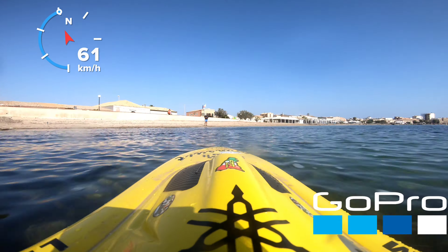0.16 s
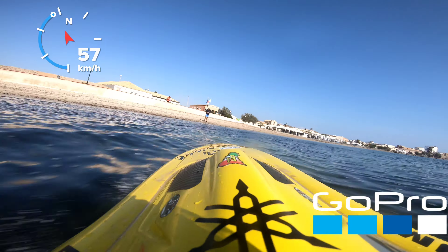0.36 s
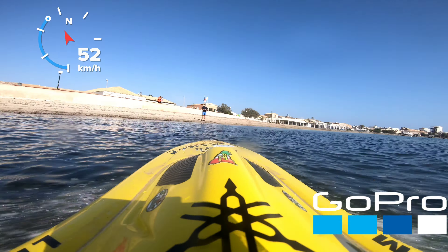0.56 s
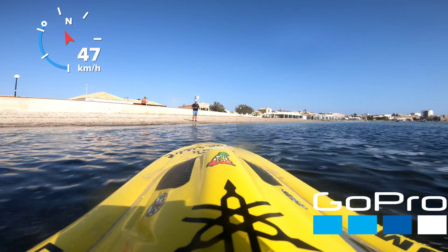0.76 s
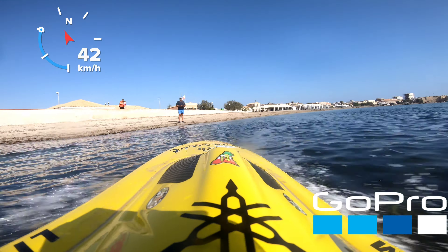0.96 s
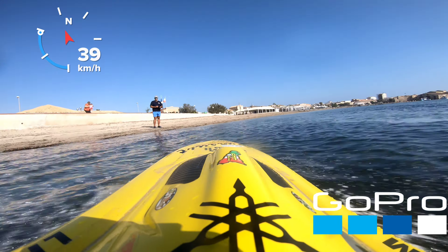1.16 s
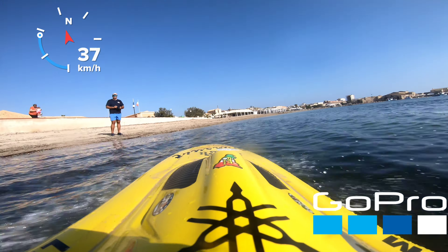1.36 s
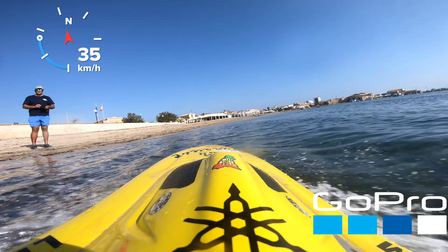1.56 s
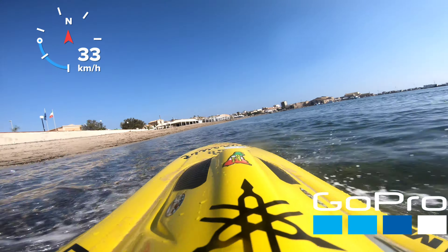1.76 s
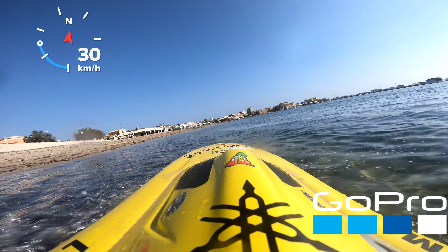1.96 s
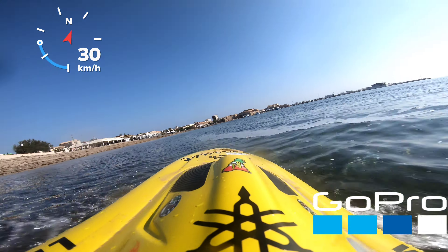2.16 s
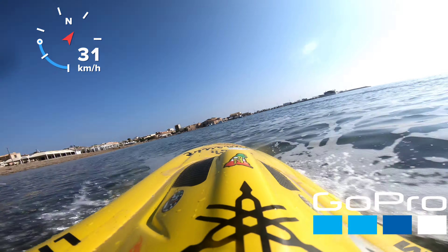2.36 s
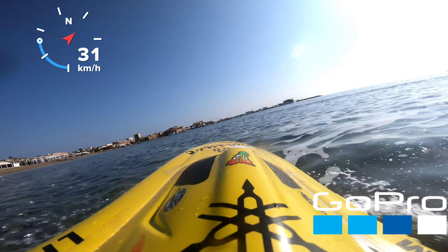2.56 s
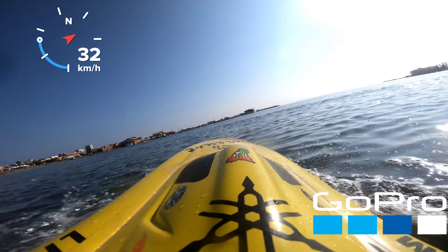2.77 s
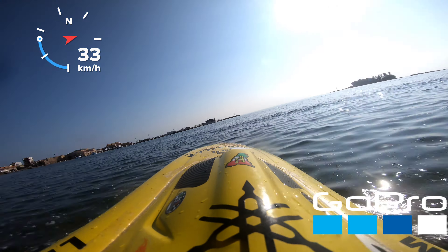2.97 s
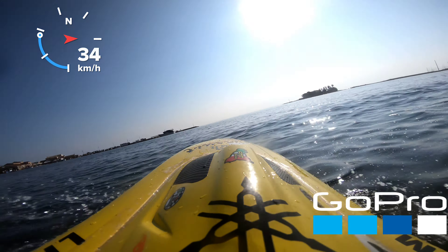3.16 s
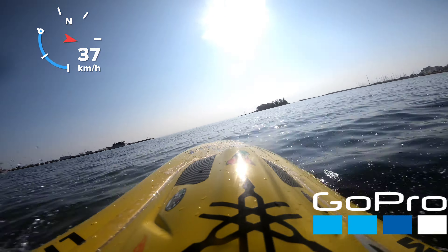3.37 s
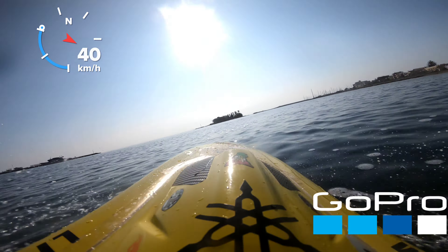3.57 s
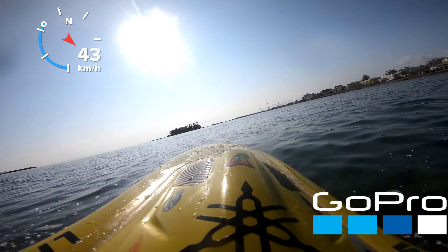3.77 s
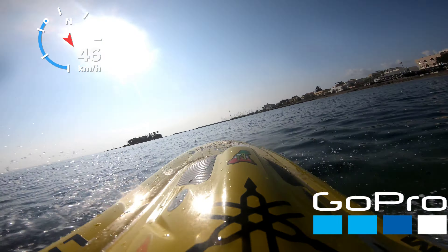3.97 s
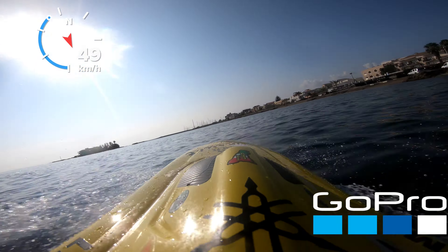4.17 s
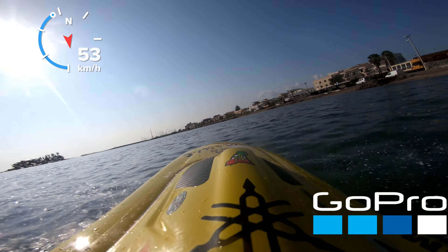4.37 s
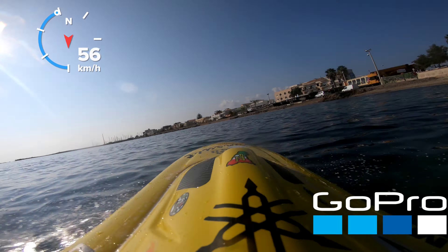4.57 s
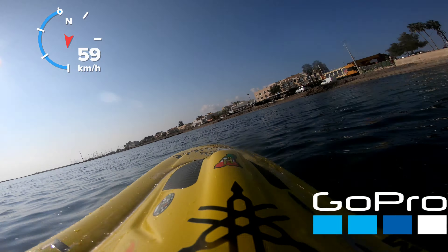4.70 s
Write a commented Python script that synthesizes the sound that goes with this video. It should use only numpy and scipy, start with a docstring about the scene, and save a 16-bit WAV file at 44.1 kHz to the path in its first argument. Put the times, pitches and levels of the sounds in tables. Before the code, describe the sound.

A model speedboat's electric motor whines close to an onboard microphone, with a rattling shaft and hissing bearings. It starts high, is throttled back for a long stretch, and slowly winds up to full speed, where the propeller lifts out of the water in rough, bright revs. The pitch falls again near the end. Underneath run low thumps of chop on the hull, washing water and a light patter of spray.

```python
"""On choppy water, aboard the deck of a small electric radio-controlled speedboat.
The motor runs flat out, is throttled back for a long turn, winds up again and is cut back once more.
Its shaft whines at multiples of its speed and rattles in its tube, the bearings hiss, and the
propeller races when it lifts clear. Underneath, chop thumps the hull, water washes along its
bottom and a fine spray patters on the deck."""
import sys
import numpy as np
from scipy import signal
from scipy.fft import rfft, irfft, next_fast_len
from scipy.io import wavfile
from scipy.ndimage import uniform_filter1d, minimum_filter1d

SR = 44100
rng = np.random.default_rng(int(sys.argv[2]) if len(sys.argv) > 2 else 0)


def store_wav(level_fs):
    """Save 16-bit WAV to argv[1]."""
    pcm = np.round(np.clip(np.atleast_2d(level_fs), -1, 1) * 32767)
    wavfile.write(sys.argv[1], SR, pcm.T.astype(np.int16))


N = 261321

# Shaft speeds in turns per second: the hull planes, the propeller starts to lift, it is clear.
PLANING_HZ, LOADED_HZ, CLEAR_HZ = 397.5, 626, 670
MOTOR_SHARE = 0.5   # the flexible shaft passes this share of a racing spurt on to the motor
# The steady bed of chop under the hull. Each row: time in seconds, rumble level in dB.
CHOP_BED = [(0, -32), (.26, -23), (.75, -24.5), (1.3, -23), (1.8, -23), (3.5, -25), (3.7, -29),
            (4.1, -27.5), (4.22, -18.5), (4.7, -16), (5.4, -14.5), (5.93, -36)]


def from_db(db):
    """Decibels to gain."""
    return 10 ** (np.asarray(db) / 20)


def rms_one(x):
    """Scale to an rms of 1."""
    return x / np.sqrt(np.mean(x ** 2) + 1e-20)


def in_time(points):
    """Draw a curve through (seconds, value) points, at every sample."""
    return np.interp(np.arange(N) / SR, *np.transpose(points))


def at_hz(points, hz):
    """Read an EQ curve of (Hz, dB) points on a log-frequency axis."""
    point_hz, point_db = np.transpose(points)
    return np.interp(np.log(np.maximum(hz, 1)), np.log(point_hz), point_db)


def swell(centre, length):
    """An arch of height 1 around a moment; both settings in seconds."""
    return np.cos(np.pi * np.clip((np.arange(N) / SR - centre) / length, -0.5, 0.5))


def hump(x, centre, width):
    """A bell of height 1 that has fallen to a half at width / 2 from its centre."""
    return 1 / (1 + (2 * (x - centre) / width) ** 2)


def drift(rate):
    """Smooth random modulation that rolls off above `rate` Hz; spread about 1."""
    step, run_in = 10, 8000
    pole = np.exp(-2 * np.pi * rate * step / SR)
    noise = rng.standard_normal(N // step + run_in + 2)
    slow = signal.lfilter([1], [1, -2 * pole, pole * pole], noise)[run_in:]
    return np.interp(np.arange(N) / step, np.arange(len(slow)), rms_one(slow))


def coloured(x, spectrum):
    """Shape a noise with an EQ curve, falling away beyond its ends; rms 1."""
    size = next_fast_len(N)
    hz = np.maximum(np.arange(size // 2 + 1) * SR / size, 1)
    skirts = np.minimum(1, np.minimum(hz / spectrum[0][0], spectrum[-1][0] / hz)) ** 4
    return rms_one(irfft(rfft(x, size) * skirts * from_db(at_hz(spectrum, hz)), size)[:N])


def resonance(x, hz, width):
    """Two-pole resonance with a gain of 1 at its peak."""
    r = np.exp(-np.pi * width / SR)
    poles = [1, -2 * r * np.cos(2 * np.pi * hz / SR), r * r]
    return signal.lfilter(np.array([1, 0, -1]) * (1 - r * r) / 2, poles, x)


def evened(x, size=3000):
    """Hold a noise at rms 1 over `size` samples, keeping its faster grain."""
    return x / np.sqrt(uniform_filter1d(uniform_filter1d(x * x, size), size) + 1e-12)


def wind_down_ring():
    """A ringing in a few narrow treble bands, heard faintly while the motor winds down; rms 1."""
    # The ringing bands. Each row: pitch in Hz, width of each of two filter passes in Hz, level in dB.
    bands = [(4950, 160, 1.5), (5450, 150, -1), (6240, 260, 2.5), (6830, 220, -1), (7350, 220, -4),
             (8320, 250, -7), (9520, 200, -9)]
    noise = rng.standard_normal(N)
    return rms_one(sum((-1) ** k * from_db(db) * resonance(resonance(noise, hz, width), hz, width)
                       for k, (hz, width, db) in enumerate(bands)))


def spray(ploughing, strain_db, drops_per_s=900):
    """Uneven drops patter on the deck as the hull ploughs; in a lull they give way to a faint ringing."""
    # The tone of drops on the deck. Each row: frequency in Hz, level in dB.
    drop_tone = [(5000, -3), (7300, -0.5), (9500, -7), (12000, -18.5), (14500, -32.5)]
    # The spray lets up as the motor winds down. Each row: centre in seconds, length in seconds.
    lulls = [(0.818, 1.0), (5.7, 0.29)]
    lull = np.sqrt(np.abs(sum(swell(s, length) for s, length in lulls)))
    drops = (rng.random(N) < drops_per_s / SR) * rng.standard_normal(N)
    patter = from_db(-71 + 1.5 * strain_db) * ploughing * coloured(drops, drop_tone)
    return (1 - lull) * patter + lull * from_db(-68) * wind_down_ring()


def hull_drone(speed, mode_hz=55.45):
    """At full speed the chop keeps the hull's lowest mode swinging almost steadily."""
    swing = np.sin(2 * np.pi * mode_hz * np.arange(N) / SR + 1.2 * drift(1.3))
    level_db = in_time(CHOP_BED) - 6 + 1.4 * drift(17)
    return from_db(level_db) * (speed / LOADED_HZ) ** 3 * rms_one(swing)


def wave_slaps(ploughing, rise_s=0.042, fall_s=0.046):
    """Gains of rumble and wash: a steady bed, and a swell each time the hull slaps into a wave."""
    # The slaps. Each row: peak time in seconds, thump level in dB, wash level in dB.
    slaps = [(.03, -15, -23), (.15, -15, -28.5), (.38, -18, -40), (.51, -19.5, -38), (0.639, -17, -20),
             (.74, -16, -20), (0.841, -37, -19.5), (0.961, -26.5, -21.5), (1.1, -19.5, -24.5),
             (1.22, -32, -26.5), (1.33, -43, -21), (1.5, -20.5, -14.5), (1.67, -19.5, -19.5),
             (1.8, -18, -18), (1.96, -28, -20.5), (2.34, -19, -31), (2.599, -23, -27), (2.78, -17.5, -17.5),
             (2.958, -21, -14.5), (3.091, -25, -17.5), (3.198, -15.5, -19), (3.402, -18, -21),
             (3.59, -20.5, -36), (4.07, -29.5, -20.5), (4.42, -16, -28), (4.62, -15, -23.5),
             (5.5, -27, -19.5), (5.649, -14.5, -22), (5.851, -13, -22.5)]
    t = np.arange(N) / SR
    rumble_power = from_db(in_time(CHOP_BED)) ** 2
    wash_power = from_db(-31.5 + 6.5 * ploughing) ** 2
    for s, thump_db, wash_db in slaps:
        slap = np.exp(-((t - s) / np.where(t < s, rise_s, fall_s)) ** 2)
        rumble_power += from_db(thump_db) ** 2 * slap
        wash_power += from_db(wash_db) ** 2 * slap
    return np.sqrt(rumble_power), np.sqrt(wash_power)


def water(ploughing):
    """Chop thumps the hull's lowest modes; the wash drums on its bottom panels."""
    # The hull's bass modes. Each row: pitch in Hz, width in Hz, level in dB.
    hull_modes = [(51.3, 11.3, -1.5), (92.5, 29, -6), (124.6, 38, -10)]
    # The tone of the wash. Each row: frequency in Hz, level in dB.
    wash_tone = [(140, -11.5), (200, -13.5), (262, 4), (325, -5), (390, 0), (480, -4.5), (560, -11.5),
                 (690, -14), (820, -29.5), (1200, -63)]
    rumble_gain, wash_gain = wave_slaps(ploughing)
    chop = rng.standard_normal(N) * from_db(7.2 * drift(5.9))
    rumble = sum((-1) ** k * from_db(db) * resonance(chop, hz, width)
                 for k, (hz, width, db) in enumerate(hull_modes))
    rumble = signal.sosfilt(signal.butter(2, [30, 165], "band", fs=SR, output="sos"), rumble)
    wash = coloured(rng.standard_normal(N) * from_db(3.3 * drift(25)), wash_tone)
    return rumble_gain * evened(rumble) + wash_gain * evened(wash)


def ride(speed, release_s=0.077):
    """Three shares, 0-1: the slow hull ploughs, the throttled motor coasts, the propeller lifts clear."""
    ploughing = 1 / (1 + (speed / PLANING_HZ) ** 12)
    slowing = uniform_filter1d(-np.gradient(np.log2(speed)) * SR, size=2000)
    slowing *= np.clip((LOADED_HZ - speed) / 80, 0, 1)
    unloaded = np.clip(slowing / 1.4, 1e-6, 1) ** 1.5   # no drive left when losing 1.4 octaves a second
    fade = np.arange(N) / SR / release_s   # peak hold: the propeller takes up its load again gradually
    coasting = np.exp(np.maximum.accumulate(np.log(unloaded) + fade) - fade)
    lifting = np.clip((speed - LOADED_HZ) / (CLEAR_HZ - LOADED_HZ), 0, 1)
    return ploughing, coasting, lifting


def strains():
    """Surges of load strain the drive line: dB changes of rattle, hiss, whine and blade beat."""
    # Each row: centre in seconds, length in seconds, then rattle, hiss, whine and blade change in dB.
    surges = [(0.04, 0.24, 0.5, -1.5, -0.5, 5.5), (0.293, 0.26, -2, 0, -1.5, 6), (0.486, 0.093, 4, 4, 2, 4),
              (1.087, 0.1, 3.5, -0.5, -7, 8.5), (1.341, 0.1, 3.5, 2, 4, -7.5),
              (1.719, 0.53, 1, 1.5, 4.5, 11.5), (2.122, 0.59, -2.5, -0.5, 3.5, 8),
              (2.457, 0.43, 1, -0.5, 6, 3.5), (2.87, 0.63, 3.5, 3.5, 1.5, -2), (3.27, 0.3, -0.5, 2, 0, 1),
              (3.644, 0.79, -1.5, -1.5, 2.5, -5), (4.056, 0.51, 1, 0.5, 2.5, -6),
              (4.323, 0.34, 2, 3.5, -2.5, 2), (4.65, 0.19, 4, 3, -1.5, 0), (5.057, 0.13, 1, 1, 5, 10),
              (5.353, 0.19, 5.5, 2.5, -1.5, 6), (5.445, 0.13, 3, 3, 7.5, -8)]
    return sum(np.outer(changes_db, swell(s, length)) for s, length, *changes_db in surges)


def rubbing(angle, depth, grain_db):
    """Friction noise that swells once a turn and varies from moment to moment."""
    return rng.standard_normal(N) * (1 + depth * np.cos(angle)) * from_db(grain_db * drift(45))


def drive_line(angle, speed, flutter, rattle_db, hiss_db):
    """The shaft rattles in its tube and the bearings hiss: brighter at speed, softer under a firm grip."""
    # The tone of the shaft in its tube. Each row: frequency in Hz, level in dB.
    rattle_tone = [(600, -4.5), (820, -8), (960, 1), (1250, 3.5), (1550, 0.5), (1800, -8), (2100, -9),
                   (2600, -48)]
    # The tone of the bearings. Each row: frequency in Hz, level in dB.
    hiss_tone = [(1700, -8.5), (2200, -3), (2550, 5), (2800, 1), (3100, 5), (3550, -8.5), (4000, -3),
                 (4450, -5), (4950, -17), (5400, -23.5), (5900, -29), (6450, -26.5), (7200, -29),
                 (10000, -43.5), (14500, -58.5)]
    rattle = evened(coloured(rubbing(angle, depth=0.15, grain_db=3.0), rattle_tone))
    hiss = evened(coloured(rubbing(angle, depth=0.092, grain_db=1.8), hiss_tone))
    sizzle = coloured(rubbing(angle, depth=0.36, grain_db=2.9), hiss_tone)
    sizzle = signal.sosfilt(signal.butter(2, 5600, "high", fs=SR, output="sos"), sizzle)
    pace = (speed / speed.max()) ** 3
    grip = 1 / (1 + (flutter / 0.0073) ** 2)
    bearings = from_db(8 - 5.5 * pace * grip) * hiss + from_db(20) * pace * sizzle
    return from_db(rattle_db) * rattle + from_db(hiss_db) * bearings


def racing_spurts():
    """The propeller sucks air and spins free for an instant: its overspeed and the gain of its beat."""
    # Each row: centre in seconds, length in seconds, overspeed as a share of the speed, beat in dB.
    spurts = [(4.642, .06, .012, -17.5), (4.837, .012, 0.022, -21), (4.857, .014, .03, -15),
              (5.066, .012, .08, -18), (4.873, .022, 0.09, -12.5), (4.893, 0.018, .10, -12.5),
              (4.924, .02, .14, -11.5), (4.939, .018, .05, -11), (5.199, .022, .11, -11),
              (5.221, .034, .06, -14.5), (5.351, 0.02, .02, -26)]
    overspeed = sum(share * swell(s, length) for s, length, share, _ in spurts)
    beat_gain = sum(from_db(db) * swell(s, length) ** 2 for s, length, _, db in spurts)
    return overspeed, beat_gain


def racing_propeller(angle, speed, overspeed):
    """Two blades run ahead of the motor and slap through foam: a rough, bright rev."""
    run_ahead = 2 * np.pi * np.cumsum(speed * (1 - MOTOR_SHARE) * overspeed) / SR
    phase = 2 * (angle + run_ahead) + 0.28 * drift(200)
    return np.sin(phase) + from_db(-13) * np.sin(2 * phase) + from_db(-22.5) * np.cos(3 * phase)


def shaft_order(angle, multiple, shake_db, slip, unrest=1):
    """One partial of the shaft, shaken in level and in phase (slip, radians) by the changing load."""
    phase = multiple * angle + unrest * slip * drift(39) + rng.uniform(0, 2 * np.pi)
    return rms_one(np.sin(phase) * from_db(unrest * shake_db * drift(33)))


def shaft_whirl(angle, speed):
    """The flexible shaft whirls and growls as it passes through its critical speeds."""
    # Each row: critical speed and width in turns per second, multiple of the speed, level in dB.
    whirls = [(242, 20, .5, -26), (419, 30, .5, -21.5), (270, 140, 1.5, -27.5), (270, 62, 1.5, -23)]
    return sum(from_db(db) * hump(speed, critical, width) * shaft_order(angle, k, shake_db=2.5, slip=0.9)
               for critical, width, k, db in whirls)


def mount(hz):
    """Gain of the resonant motor mount for a partial sweeping through it."""
    # The mount's resonances. Each row: pitch in Hz, width in Hz, level in dB.
    modes = [(325, 170, -3.5), (403.7, 89, -2.5), (508.5, 73, -7), (629, 180, -10), (734.5, 78, -9),
             (955, 22, -8.5), (1060, 144, -4.5), (1200, 710, -14), (1542, 220, -6), (1823, 100, 4),
             (2350, 250, 1), (2554, 230, 5)]
    return np.sqrt(sum((from_db(db) * hump(hz, centre, width)) ** 2 for centre, width, db in modes))


def flare(multiple):
    """Change in dB of one shaft order as it flares up or sinks for a moment."""
    # Each row: centre in seconds, length in seconds, multiple of the speed, change in dB.
    flares = [(0.63, .085, 6, 12), (0.537, .07, 3, 20), (0.48, 0.25, 4, -13), (5.41, 0.071, 4, -16),
              (.3, .14, 8, 11), (0.15, 0.16, 1, 3.5), (4.7, 0.4, 7, 4.5), (3.66, 0.39, 6.5, 16.5),
              (0.095, 0.46, 7, 0.5), (2.43, 0.098, 5, 6), (1.64, 0.25, 5, 6), (1.74, .22, 3, 2),
              (1.74, 0.27, 6, 5.5), (2.66, 0.043, 5, 11), (3.68, 0.61, 3, -9.5), (3.64, 0.48, 6, 4.5),
              (3.84, .14, 4, -8), (4.31, 0.12, 6, 7.5), (4.26, 0.22, 3, -8), (4.28, 0.47, 5, 7),
              (4.36, .2, 7, 6.5), (4.32, 0.1, 9, 5), (4.47, 0.075, 3, 7), (4.55, 0.097, 6, 9.5),
              (4.7, 0.059, 5, 10.5), (4.79, 0.16, 4, 3.5), (4.6, 0.091, 3, 6), (5.04, 0.087, 5, 6),
              (6, 0.049, 5, 9), (4.7, 0.071, 3, 8), (5.82, 0.47, 5, 7)]
    return sum(db * swell(s, length) for s, length, k, db in flares if k == multiple)


def motor_hum(angle, speed, overspeed, hum_change_db, blade_change_db):
    """Imbalance hums about once a turn and the blades beat twice a turn, both through the mount."""
    # Brief dips in level. Each row: centre in seconds, length in seconds, hum cut in dB,
    # blade cut in dB; a negative cut is a boost.
    dips = [(0.401, 0.087, 7, 2.5), (0.643, 0.068, 3.5, 4), (0.978, 0.18, 1, -8.5), (1.31, 0.11, 6, -5.5),
            (1.657, 0.49, 5, 9), (2.805, 0.23, 9, -6), (3.131, 0.071, 8, -0.5), (3.223, 0.061, 7.5, -2),
            (4.05, 0.016, 11, 11), (4.262, 0.028, 30, -3), (4.744, 0.12, -1, 8), (5.046, 0.11, 4, 4.5),
            (5.41, 0.22, 4.5, 4), (5.53, 0.26, -1, 7.5)]
    hum_cut_db, blade_cut_db = sum(np.outer(cuts_db, swell(s, length)) for s, length, *cuts_db in dips)
    hum_gain = from_db(-8.5 + hum_change_db - hum_cut_db + flare(1)) * mount(speed)
    blade_gain = from_db(-10.5 + blade_change_db - blade_cut_db) * mount(2 * speed)
    imbalance = hum_gain * shaft_order(angle, 0.99, shake_db=1.71, slip=0.16)
    blades = blade_gain * shaft_order(angle, 2, shake_db=2.5, slip=0.071)
    return (imbalance + blades) / (1 + (overspeed / 0.17) ** 2)   # both duck in a spurt


def motor_whine(angle, speed, flutter, overspeed, overtone_db):
    """The motor poles sing four times a turn through the mount; the hull colours the fainter orders."""
    # The faint shaft orders. Each row: multiple of the speed, level in dB relative to overtone_db.
    overtones = [(2.5, -3.5), (3, 15.5), (5, 11), (5.5, -0.5), (6, 10.5), (6.5, -4), (7, 5.5), (8, 4.5),
                 (9, -1.5), (10, -5.5), (11, -5), (14, -3), (15, -3.5)]
    # The hull as an EQ on those orders. Each row: frequency in Hz, gain in dB.
    hull_eq = [(700, 6.5), (880, -7), (1030, -2.5), (1300, 1), (1370, 3.5), (1460, 1.5), (1620, 0),
               (1900, -11.5), (2250, -10.5), (2440, -7.5), (2620, -3.5), (2850, -8.5), (3080, -3),
               (3250, -10.5), (3500, -20), (3850, -12.5), (4100, -3.5), (4400, -2.5), (4750, -16),
               (5050, -15.5), (5450, -33), (9500, -41)]
    unrest = np.sqrt(np.minimum(flutter / 0.007, 1))   # a firm grip gives clean, steady partials
    pole_gain = from_db(-25.5 + flare(4)) * mount(4 * speed)
    whine = pole_gain * shaft_order(angle, 4, shake_db=4.0, slip=0.68, unrest=unrest)
    for k, db in overtones:
        partial = shaft_order(angle, k, shake_db=2.6, slip=0.55, unrest=unrest)
        wander_db = 2.5 * drift(15)
        whine += from_db(overtone_db + db + at_hz(hull_eq, k * speed) + flare(k) + wander_db) * partial
    return whine / (1 + (overspeed / 0.052) ** 2)   # the whine needs load and fades in a spurt


def scene():
    """One shaft drives every motor sound; its speed also sets how the hull rides the water."""
    # The shaft's run. Each row: time in seconds, speed in turns per second (capped below).
    speed_curve = [(0.0, 645), (0.05, 626), (0.21, 624), (0.285, 660), (0.36, 630), (0.385, 540),
                   (0.415, 449), (0.48, 449.5), (0.525, 381), (0.58, 333.4), (0.69, 289.0), (0.89, 256.5),
                   (1.0, 242.5), (1.04, 259.5), (1.17, 313.8), (1.29, 301.5), (1.38, 332.5), (1.48, 330.5),
                   (1.91, 297.5), (1.96, 310.0), (2.1, 292.8), (2.24, 290.7), (2.44, 297.4), (2.66, 295.3),
                   (2.89, 356.7), (3.23, 367.0), (3.33, 386.7), (3.45, 386.7), (3.53, 403.5), (3.79, 408.9),
                   (3.84, 421.1), (4.36, 462.3), (4.47, 483.5), (4.59, 517.2), (4.72, 637.0), (4.82, 631.3),
                   (4.9, 685.4), (4.97, 630.2), (5.15, 637.5), (5.2, 699.8), (5.26, 644.8), (5.305, 642),
                   (5.335, 595), (5.36, 500), (5.38, 470.3), (5.48, 380.3), (5.53, 371.4), (5.59, 344.5),
                   (5.78, 316.1), (5.83, 288.0), (5.93, 272.3)]
    speed = in_time(speed_curve)
    ploughing, coasting, lifting = ride(speed)
    speed = np.minimum(speed, CLEAR_HZ)   # only a racing spurt takes the shaft faster
    overspeed, beat_gain = racing_spurts()
    flutter = 0.0016 + 0.0045 * ploughing + 0.012 * coasting + 0.017 * lifting ** 2   # share of the speed
    waver = flutter * (1 - lifting) * drift(60)
    angle = 2 * np.pi * np.cumsum(speed * (1 + MOTOR_SHARE * overspeed + waver)) / SR
    angle += 0.21 * lifting ** 2 * drift(450)   # foam tears at the lifting propeller: a rasp

    octaves = np.log2(speed / LOADED_HZ)
    slack = coasting * speed / LOADED_HZ   # a fast shaft without load rattles more and hums less
    rattle_strain_db, hiss_strain_db, whine_strain_db, blade_strain_db = strains()
    rattle_db = -31 + 2 * octaves + 9 * lifting + 4.5 * slack + rattle_strain_db
    hiss_db = -44 + 4 * octaves + 1.5 * lifting + 0.5 * slack + hiss_strain_db
    hiss_db += 4.5 * overspeed / overspeed.max()
    blade_change_db = blade_strain_db - 3 * ploughing - 6 * coasting   # blades and whine need load
    whine_gain = from_db(whine_strain_db - 4 * coasting)

    hum = motor_hum(angle, speed, overspeed, hum_change_db=-2 * slack, blade_change_db=blade_change_db)
    revs = beat_gain * racing_propeller(angle, speed, overspeed)
    growl = shaft_whirl(angle, speed)
    whine = whine_gain * motor_whine(angle, speed, flutter, overspeed, overtone_db=hiss_db - 4 * ploughing)
    friction = drive_line(angle, speed, flutter, rattle_db, hiss_db)
    background = water(ploughing) + hull_drone(speed) + spray(ploughing, hiss_strain_db)
    return (background + friction + revs + growl + hum + whine)[None]


def record(dry, ceiling=0.88, cutoff_hz=14700):
    """A fast limiter ducks the highest peaks; the top is cut steeply."""
    gain = minimum_filter1d(np.minimum(1, ceiling / (np.abs(dry) + 1e-9)), size=601)
    gain = uniform_filter1d(uniform_filter1d(gain, size=301), size=301)
    return signal.sosfilt(signal.cheby2(12, 70, cutoff_hz, fs=SR, output="sos"), gain * dry)


dry = scene()
out = record(dry)
store_wav(out)
```